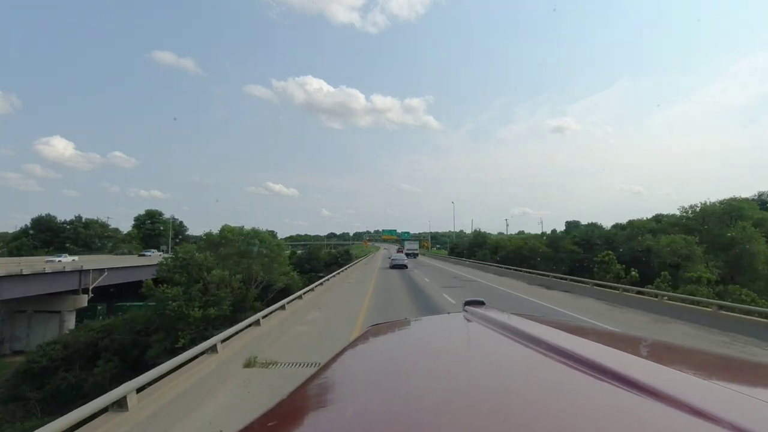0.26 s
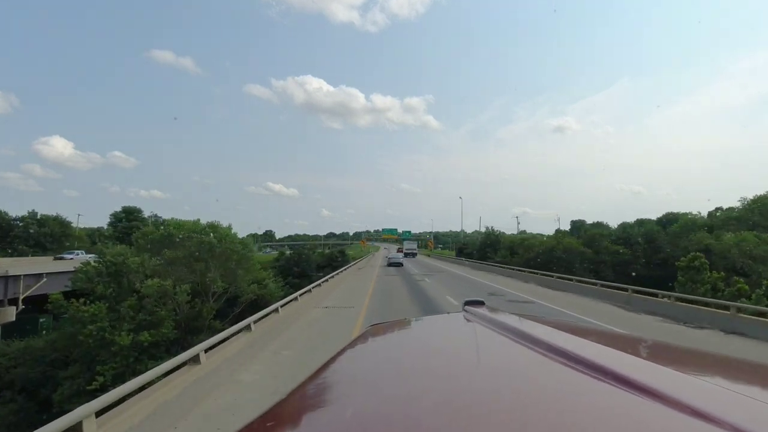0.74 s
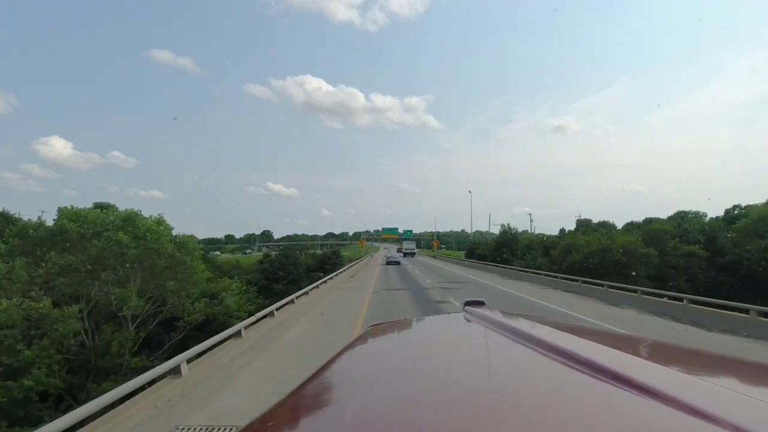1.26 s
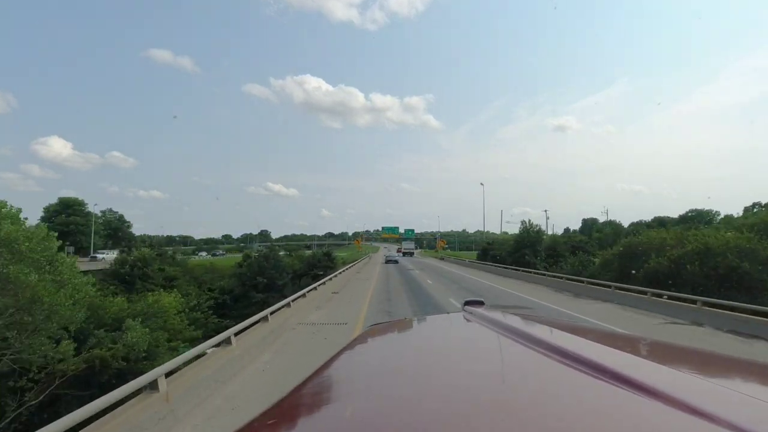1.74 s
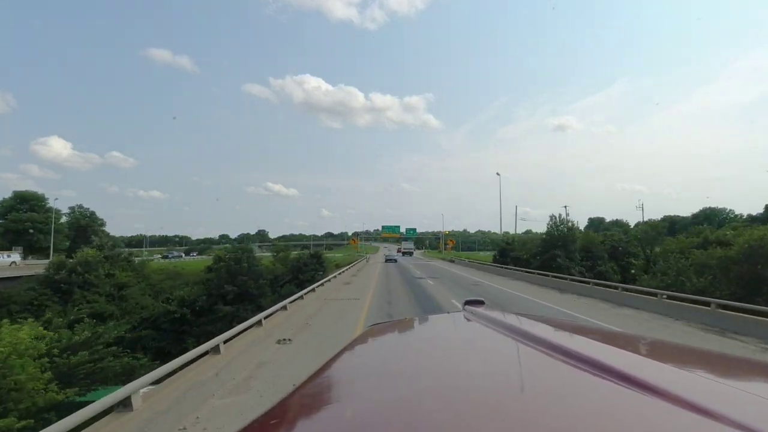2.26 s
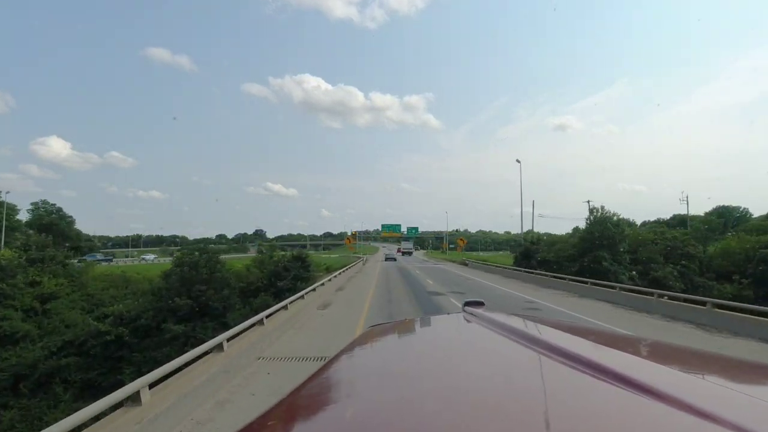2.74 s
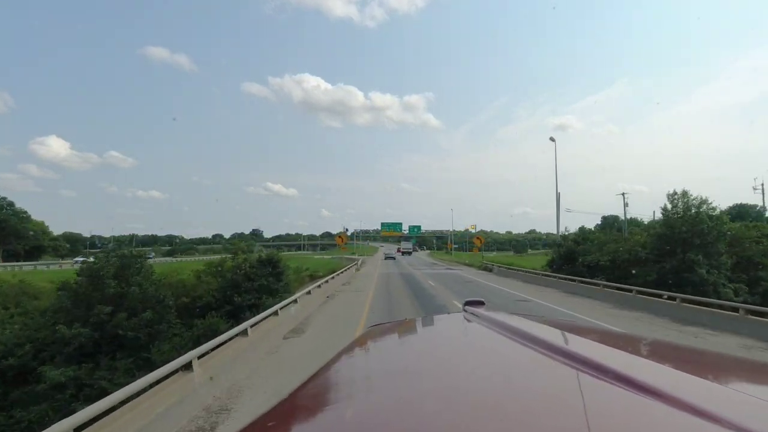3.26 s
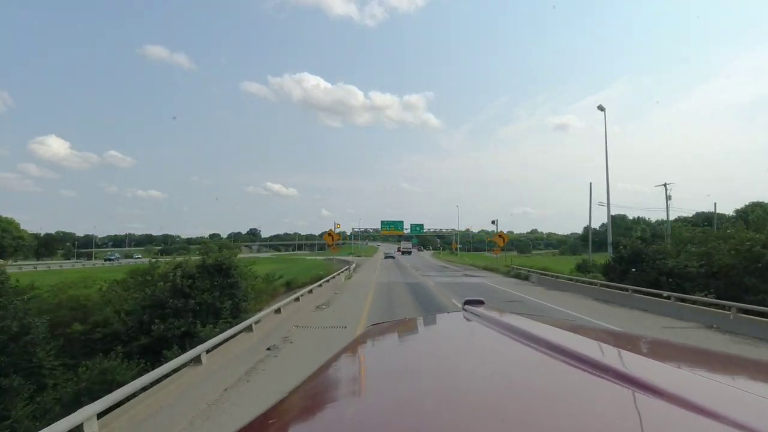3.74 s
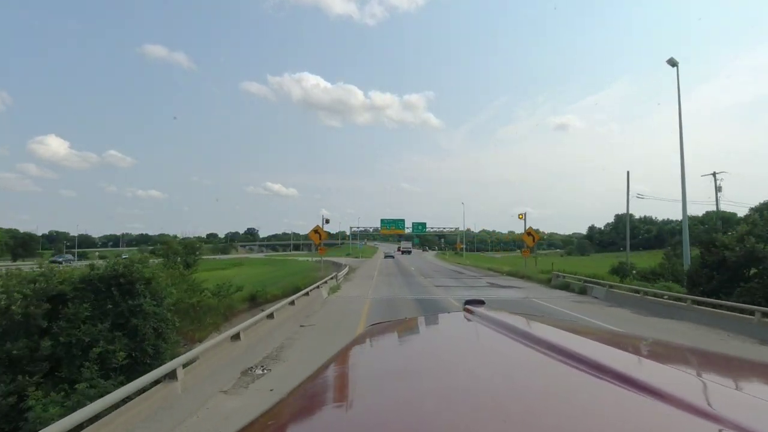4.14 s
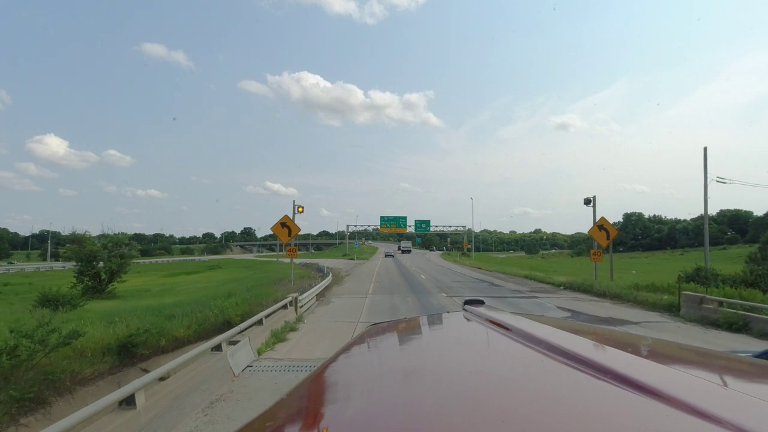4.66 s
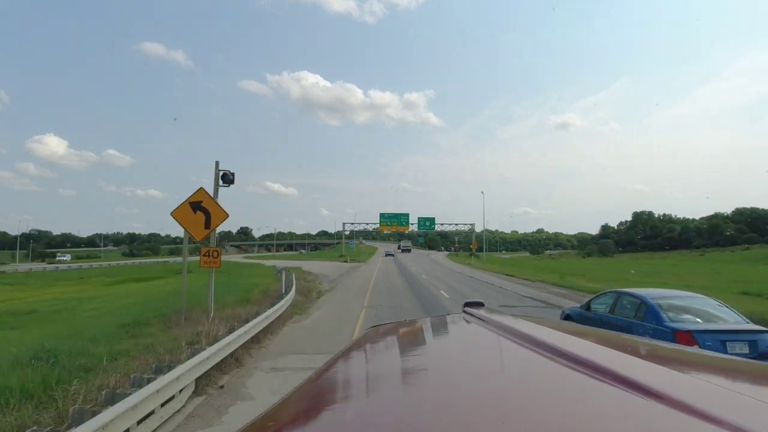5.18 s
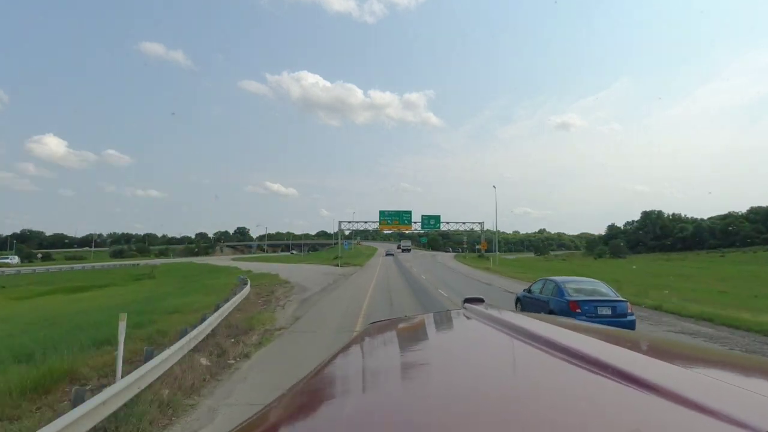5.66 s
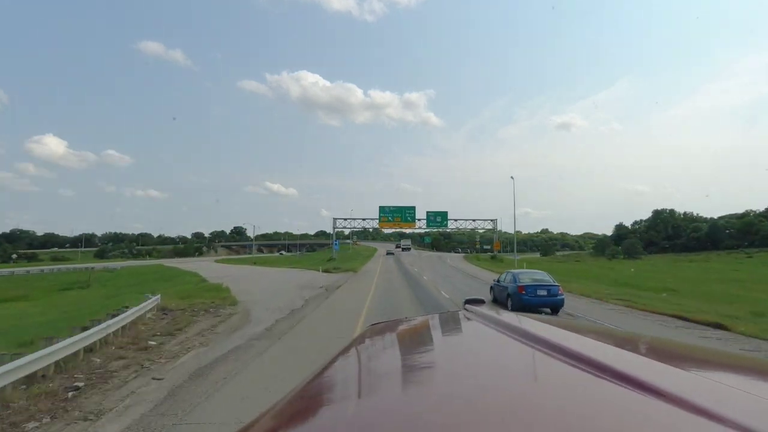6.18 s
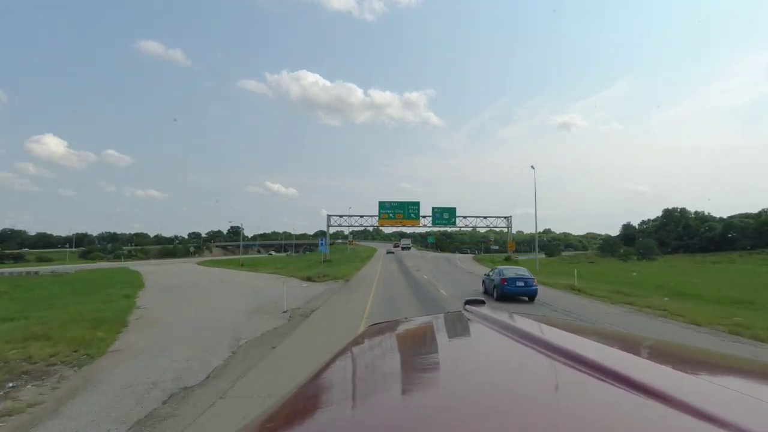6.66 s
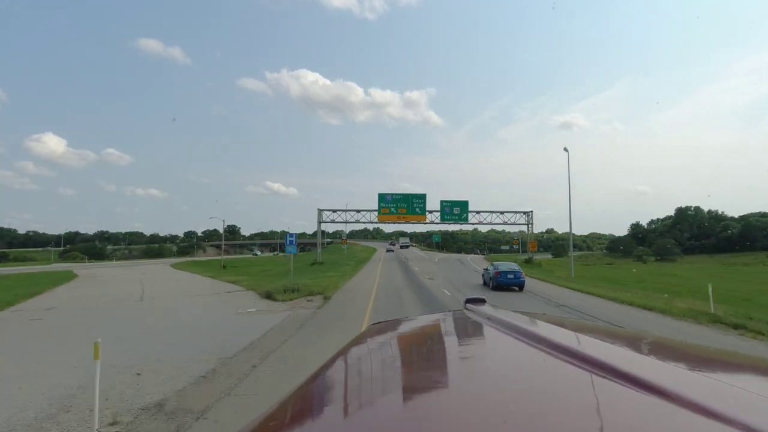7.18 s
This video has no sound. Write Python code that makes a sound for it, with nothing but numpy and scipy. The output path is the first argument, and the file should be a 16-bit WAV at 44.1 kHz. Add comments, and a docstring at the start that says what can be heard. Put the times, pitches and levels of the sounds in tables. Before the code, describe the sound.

Close stereo microphone in a moving truck cab. Pitched, rough engine braking opens the scene and stops after under a second, leaving tyre rumble, air rush and a softer engine hum that rises with throttle. A hard exhaust bark brings the brake back midway; its booming, crackling chatter slowly descends and weakens to the end, still braking, amid loose cab rattles, tiny high squeaks and a thin wavering turbo whistle.

```python
"""In the cab of a heavy diesel truck slowing on a highway ramp, the engine brake chatters: uneven blow-downs
drive engine orders through resonances, with cracks and gas noise. Shaped noise makes road rumble, air and an
early valve puff. The brake cuts out, the engine hums and revs for the downshift, cab trim squeaks and rattles
in short bursts, and a wavering sine whistles as the turbo. Then the brake barks back in and runs down slowly."""
import sys
import numpy as np
from scipy import signal
from scipy.fft import rfft, irfft, next_fast_len
from scipy.io import wavfile
from scipy.ndimage import uniform_filter1d, minimum_filter1d, map_coordinates

SR = 44100
rng = np.random.default_rng(int(sys.argv[2]) if len(sys.argv) > 2 else 0)


def pcm_store(signal):
    """Save signal as 16-bit PCM."""
    levels = np.round(np.clip(np.atleast_2d(signal), -1, 1) * 32767)
    wavfile.write(sys.argv[1], SR, levels.astype(np.int16).T)


N = 327209

# resonances of exhaust and cab, which boom as an engine order slides through: f/Hz, width/Hz, level/dB
BODY = [(44, 4.8, -17.5), (128.2, 8.7, -19), (154.83, 7.94, -9), (175.3, 42, -16.5), (220.24, 5.33, -5.5),
        (253.5, 5, -22.5), (309.5, 7.05, -16.5), (348.8, 8.3, -33), (380.3, 13.4, -20), (410, 18, -35.5),
        (523, 15, -35)]
# colour of the low exhaust churn: f/Hz, relative density/dB per Hz
CHURN = [(53, -39.5), (90, -11.5), (142, -3), (221, 6), (242, 4), (286, -20), (381, -3), (460, -27.5),
         (480, -24.5), (620, -56.5), (1060, -120)]
BRAKE_OFF_S, BRAKE_ON_S = 0.685, 3.431  # the brake rests during the downshift


def amp(db):
    """Decibels to gain."""
    return 10 ** (np.asarray(db) / 20)


def unit(x):
    """x at rms 1."""
    return x / np.sqrt(np.mean(x ** 2) + 1e-20)


def clock():
    """Time of every sample in seconds."""
    return np.arange(N) / SR


def along(points, hz):
    """Values at hz from (f/Hz, value) points, joined on a log frequency axis."""
    f, v = np.transpose(points)
    return np.interp(np.log(hz + 1), np.log(f + 1), v)


def curves(rows):
    """One value per sample for each column after the time."""
    s, *cols = np.transpose(rows)
    return [np.interp(clock(), s, c) for c in cols]


def wander(rate, t):
    """A smooth random value at the times t, rate knots a second."""
    knots = rng.standard_normal(int(N * rate / SR) + 4)
    return map_coordinates(knots, [t * rate])


def wobble(rate):
    """A smooth random curve with one value per sample, rate knots a second."""
    coarse = clock()[::64]
    return np.interp(clock(), coarse, wander(rate, coarse))


def switch(on, off, rise, fall):
    """Gain that climbs straight to 1 from the time on, and falls straight to 0 from the time off."""
    opening = np.clip((clock() - on) / rise, 0, 1)
    closing = np.clip((off - clock()) / fall + 1, 0, 1)
    return opening * closing


def swells(rows):
    """Gain of bell-shaped swells, each (t/s, level/dB, half length/s)."""
    return sum(amp(db) * np.exp(-np.minimum(((clock() - s) / half) ** 2, 50)) for s, db, half in rows)


def blip(start, rise):
    """An envelope that peaks at 1, rise seconds after start."""
    u = np.clip((clock() - start) / rise, 0, 50)
    return u * np.exp(1 - u)


def filtered(x, response):
    """x times a complex response of frequency."""
    m = next_fast_len(N + SR // 4)
    return irfft(rfft(x, m) * response(np.fft.rfftfreq(m, 1 / SR)), m)[..., :N]


def rush(spectrum, gate=1):
    """Stereo noise of rms 1, gated and then coloured; the bass is alike in both ears."""
    # likeness of the ears, from 1 for the same to 0 for unrelated: f/Hz, correlation
    likeness = [(100, 1), (250, 0.99), (500, 1), (1000, .68), (2000, -0.064), (12000, 0.15)]

    def colour(hz):
        turn = np.arccos(np.clip(along(likeness, hz), -1, 1)) / 2
        return amp(along(spectrum, hz)) * np.array([np.cos(turn), np.sin(turn)])

    mid, side = filtered(gate * rng.standard_normal((2, N)), colour)
    return unit(np.array([mid + side, mid - side]))


def whistle(hz, spread_hz):
    """A fuzzy tone of rms 1, its pitch wandering differently in each ear."""
    def ear():
        phase = 2 * np.pi * np.cumsum(hz + spread_hz * wobble(300)) / SR
        return np.sqrt(2) * np.sin(phase)

    return np.array([ear(), ear()])


def cycles(speed, first):
    """Engine cycles (two crank turns, six cylinders) counted from the time first."""
    count = np.cumsum(speed) / SR
    return count - np.interp(first, clock(), count)


def resonances(modes, f, age=np.inf):
    """Complex response at f, age seconds after the drive began: narrow resonances take longest to build up."""
    total = 0
    for k, (centre, width, db) in enumerate(modes):
        built_up = 1 - np.exp(-np.pi * width * age)
        peak = 1j * f * width / (centre * centre - f * f + 1j * f * width)
        total = total + (-1) ** k * amp(db) * built_up * peak  # neighbours have opposite signs
    return total


def orders(turns, gain, multiples, rough, size=16):
    """Sum of engine orders, each strength scattered at random so that no two cycles are quite alike."""
    pick = slice(None, None, size)  # worked out on every size-th sample
    t, wave = clock()[pick], 0
    for k in multiples:
        strength, colour = gain(k, pick)
        scatter = rough * (wander(14, t) + 1j * wander(14, t))
        wave = wave + np.real((strength + scatter) * colour * np.exp(2j * np.pi * k * turns[pick]))
    return np.sqrt(2) * signal.resample_poly(wave, size, 1)[:N]


def drone(turns, speed, age, strength, rough, count=44):
    """Every engine order sounds through the resonances of exhaust and cab."""
    def gain(k, pick):
        return strength(k, pick), resonances(BODY, k * speed[pick], age[pick])

    return orders(turns, gain, range(1, count + 1), rough)


def order_strength(blows, k):
    """Drive of order k by six blow-downs: even ones give only multiples of six, uneven ones fill in the rest."""
    push_db, lag_degrees, _ = np.transpose(blows)
    at = np.arange(6) / 6 + lag_degrees / 720  # place in the cycle
    return np.mean(amp(push_db) * np.exp(-2j * np.pi * k * at))


def per_cylinder(turns, blows):
    """Bark of whichever cylinder is blowing down."""
    cylinder = np.floor(turns * len(blows)).astype(int) % len(blows)
    return amp(np.transpose(blows)[2])[cylinder]


def rasp(wave, bark, crack_db, tear_db, sharpness, muffle_hz):
    """Each pressure crest steepens into a crack that rings the stacks and tears off a burst of gas noise."""
    # ring of the exhaust stacks: f/Hz, width/Hz, level/dB
    stack = [(511, 22, 2.5), (688.4, 34, -3.5), (793.4, 28, -2.5), (972, 16, -1), (1180, 33, -15.5),
             (1470, 84, -20.5), (2100, 190, -19)]
    # colour of the torn gas: f/Hz, relative density/dB per Hz
    gas = [(250, -33), (400, -3), (445, -10.5), (471, -20), (520, -7), (593, -12), (682, -5.5),
           (888, -14.5), (972, -8), (1110, -20.5), (1240, -24), (1530, -26.5), (1730, -38), (3000, -44.5),
           (3900, -77), (6600, -120)]

    def stack_response(f):
        low_cut = f ** 4 / (f ** 4 + 420 ** 4)
        return resonances(stack, f) / (1 + (f / 1700) ** 4) * low_cut

    # even out the level over 25 ms
    wave = wave / np.sqrt(np.abs(uniform_filter1d(wave ** 2, SR // 40)) + 1e-9)
    crests = signal.find_peaks(wave, height=0, distance=SR // 330)[0]
    cracks = np.zeros(N)
    cracks[crests] = (np.tanh(wave) * bark * amp(3.1 * wobble(90)))[crests]
    ring = unit(filtered(cracks, stack_response))
    jets = bark * (0.42 + np.clip(wave, 0, 1.5) ** sharpness)
    harsh = amp(crack_db) * ring + amp(tear_db) * rush(gas, jets)
    return filtered(harsh, lambda f: 1 / (1 + (f / muffle_hz) ** 4))


def high_gear_brake():
    """The brake at low engine speed: six uneven blow-downs a cycle, softened in the high orders, chatter."""
    # engine speed: t/s, cycles per s
    high_gear_speed = [(0, 11.48), (.7, 11.39)]
    # the six unequal blow-downs of a cycle: push level/dB, lag/crank degrees, bark level/dB
    high_gear_blows = [(-5, -4, -3.5), (-12.5, 2.5, -3.5), (3.5, -3.5, 2), (-13, -1.3, -6), (-2, 15, -3),
                       (-2, -6.5, -5)]
    soft_order = 33.6  # the blow-downs carry little above this order

    def strength(k, pick):
        return order_strength(high_gear_blows, k) / (1 + (k / soft_order) ** 10)

    speed, = curves(high_gear_speed)
    turns = cycles(speed, first=0.007475)
    # the brake has been on for a second as we start to listen
    wave = drone(turns, speed, clock() + 1, strength, rough=0.039)
    bark = per_cylinder(turns, high_gear_blows)
    churn = amp(-27) * rush(CHURN, bark)
    chatter = amp(-37.5) * rasp(wave, bark, crack_db=-0.7, tear_db=-1.5, sharpness=.7, muffle_hz=2200)
    return (wave + churn + chatter) * switch(on=0, off=BRAKE_OFF_S, rise=.004, fall=0.066)


def road():
    """Tyres shake the cab; wind and engine-bay air leak in as a steady rush and a hiss."""
    # colour of the rumble: f/Hz, relative density/dB per Hz
    rumble_colour = [(8.8, -29), (15, 5), (92, -2.5), (110, -10), (140, -34.5), (240, -120)]
    # jolts that shake the cab: t/s, level/dB, half length/s
    jolts = [(1.13, -33, .08), (2.56, -31, .05), (2.83, -30.5, .07), (3.45, -21.5, 0.056),
             (4.69, -31, 0.19), (5.7, -22.5, .2), (6.4, -25, .09)]
    # colour of the rush inside the cab: f/Hz, relative density/dB per Hz
    cab_colour = [(41, -31.5), (70, -0.5), (92, -17.5), (129, -3), (158, -17), (212, -8.5), (248, -20.5),
                  (284, -13), (325, -17.5), (417, -22), (446, -24.5), (701, -26), (899, -28.5),
                  (1510, -33.5), (15500, -64.5)]
    # course of the hiss, before its lift and flicker: t/s, level/dB
    air_course = [(.55, -57), (.77, -63), (1.7, -71), (2.65, -65.5), (3.2, -66), (4.5, -62.5), (5.65, -57),
                  (7.4, -60.5)]
    # colour of the hiss: f/Hz, relative density/dB per Hz
    hiss_colour = [(1500, -14.5), (3000, -5.5), (5000, -0.5), (6900, -13), (8200, -2), (9200, 5.5),
                   (10500, -4.5), (12500, -8.5), (15500, -9)]
    rumble_db = -30.5 + 1.5 * wobble(3.8)
    rumble = (amp(rumble_db) + swells(jolts)) * rush(rumble_colour)
    gusts_db = .6 * wobble(8)
    cab = amp(-32 + gusts_db) * rush(cab_colour)
    course_db, = curves(air_course)
    hiss = amp(course_db + 4.5 + 0.85 * wobble(23)) * rush(hiss_colour)
    return rumble + cab + hiss


def air_valve():
    """A short puff of compressed air: coloured noise with a quick rise and a slower fall."""
    # colour of the puff: f/Hz, relative density/dB per Hz
    puff_colour = [(1180, -37.5), (2000, -6), (2660, -13.5), (2870, -4.5), (3080, -6), (4450, -2.5),
                   (7090, -13.5), (9180, -4.5), (15600, -13.5)]
    return amp(-33.5) * rush(puff_colour) * switch(on=0.11, off=0.17, rise=0.028, fall=0.078) ** 2


def throttle():
    """Off the brake the engine hums through the same resonances, and is revved to match the lower gear."""
    # engine speed during the downshift: t/s, cycles per s
    throttle_speed = [(.78, 11.2), (1.18, 10.75), (1.45, 11.62), (1.7, 12.68), (2, 13.3), (2.2, 13.54),
                      (2.35, 13.3), (2.66, 13.28), (2.9, 12.92)]
    # dabs of throttle, ahead of the resonances: t/s, level/dB, half length/s
    dabs = [(1.18, -15.5, 0.042), (2.67, -3, 0.21)]
    # balance of the overtones: multiple of the cycle rate, relative level/dB
    throttle_tone = [(6, -3.5), (10, -18), (14, -9.5), (15, -14.5), (16, 2), (17, -10.5), (18, -5.5),
                     (20, -12), (22, -13.5), (23, -10.5)]
    coast_db, pedal_db, lift_s = -31, -15, 2.86  # no throttle, light throttle added, foot lifts
    speed, = curves(throttle_speed)
    turns = cycles(speed, first=0)
    light = amp(pedal_db) * switch(on=0.61, off=lift_s, rise=1.0, fall=0.097)
    revs = swells(dabs) * switch(on=0, off=lift_s, rise=.1, fall=0.12)
    pedal = amp(coast_db) + light + revs

    hum_orders = {12: 1, 24: amp(-11.5)}
    hum_gain = lambda k, pick: (hum_orders[k], resonances(BODY, k * speed[pick]))
    hum = pedal * orders(turns, hum_gain, hum_orders, rough=0.033)

    tone = {round(k): amp(db) * np.exp(2j * np.pi * rng.random()) for k, db in throttle_tone}
    overtones = unit(orders(turns, lambda k, pick: (1, tone[k]), tone, rough=0.1))
    overtone_db = -36 + 3 * (speed - 12)  # louder by 3 dB for each cycle per s
    return (hum + amp(overtone_db) * overtones) * switch(on=0.55, off=3.42, rise=0.041, fall=0.029)


def fittings():
    """Trim squeaks as short fuzzy tones and loose parts rattle as noise bursts while the cab flexes."""
    # squeaks of the cab trim, before a common trim of level: t/s, level/dB, f/Hz
    trim_squeaks = [(1.3024, -51, 12800), (1.3783, -62, 12700), (1.8063, -63, 12800),
                    (2.6005, -52.5, 12700), (3.8695, -56.5, 12900), (5.3033, -54, 12600),
                    (5.7423, -52, 12800), (5.7788, -54, 12700), (6.1459, -38.5, 12600)]
    # rattles of loose fittings, before a common trim of level: t/s, level/dB
    loose_parts = [(2.3787, -46.5), (2.4587, -46), (2.6289, -42), (2.7289, -46), (2.9094, -46),
                   (3.4638, -44.5), (4.679, -47), (5.594, -34.5), (5.7142, -34.5), (5.77, -40)]
    # colour of the rattles: f/Hz, relative density/dB per Hz
    rattle_colour = [(1200, -4), (2200, 1.5), (3300, 3), (5100, -2), (7000, -9), (9300, -2.5),
                     (15000, -7.5)]
    squeaks = sum(amp(db - 7.0) * blip(s, rise=.012) * whistle(hz, spread_hz=140)
                  for s, db, hz in trim_squeaks)
    shakes = sum(amp(db - 10.5) * blip(s, rise=0.02) for s, db in loose_parts)
    return squeaks + shakes * rush(rattle_colour)


def turbo():
    """The turbocharger's whistle flutters during the shift, then climbs to a steady pitch, coming and going."""
    # whistle during the shift: t/s, f/Hz, level/dB
    shift_whistle = [(2.85, 5900, -74), (3.25, 5700, -63.5), (3.5, 5740, -60), (3.7, 6400, -65.5),
                     (4, 6520, -86)]
    # swells of the climbing whistle, before a random flicker: t/s, level/dB, half length/s
    whistle_swells = [(4.37, -63, .08), (5.32, -60.5, .06), (6.28, -56, 0.16), (6.88, -59, 0.41)]
    settled_hz, spool_hz, spool_at_s, spool_s = 5420, 798.4, 4.37, .87  # pitch, depth below, when, time constant
    hz, db = curves(shift_whistle)
    shift = amp(db) * whistle(hz, spread_hz=130) * switch(on=2.8, off=4.5, rise=.1, fall=.1)
    below_hz = spool_hz * np.exp(-np.maximum(clock() - spool_at_s, -.5) / spool_s)
    climb = whistle(settled_hz - below_hz, spread_hz=7 + .06 * below_hz)
    return shift + swells(whistle_swells) * amp(1.2 * wobble(20)) * climb


def low_gear_brake():
    """After the downshift, a hard bark, then a drone whose boom moves up the orders as the engine slows."""
    # engine speed: t/s, cycles per s
    low_gear_speed = [(3.45, 13.196), (4, 12.987), (4.8, 12.825), (5.6, 12.654), (6.2, 12.502),
                      (7.42, 12.21)]
    # six blow-downs at full speed: push level/dB, lag/crank degrees, bark level/dB
    fast_blows = [(8.5, 17, 4.5), (0, 21.5, 0.5), (5.5, 8, -1.5), (6, 23.5, -9.5), (-1.6, -30.5, -5),
                  (-0.2, 25, -2.5)]
    # and once the engine has slowed: push level/dB, lag/crank degrees, bark level/dB
    slowed_blows = [(5.5, 17, 1.5), (1.6, 23, -1.5), (1, 4.5, -5), (3.5, 21, -9), (3, -22.0, 1.5),
                    (-2.5, 28.5, 0.0)]
    # colour of the first bark: f/Hz, relative density/dB per Hz
    first_bark_colour = [(30, 6), (60, 10.5), (120, 1.5), (180, 8), (212, 23), (260, 9.5), (320, 4),
                         (500, -4), (1000, -1), (1500, -16), (2100, -15), (2700, -33.5), (3280, -24),
                         (3700, -38), (12000, -62)]
    slowing_from_s, slowing_s = 4.18, 2.4  # the one pattern gives way to the other
    boost_db, boost_s = 3, .4  # extra rasp as the brake bites, and its time constant
    ease_db_per_s = 1.31  # the braking eases as the truck slows

    speed, = curves(low_gear_speed)
    turns = cycles(speed, first=3.455)
    age = np.maximum(clock() - BRAKE_ON_S, 0)
    slowed = np.clip((clock() - slowing_from_s) / slowing_s, 0, 1)

    def strength(k, pick):
        fast = (1 - slowed[pick]) * order_strength(fast_blows, k)
        return fast + slowed[pick] * order_strength(slowed_blows, k)

    wave = drone(turns, speed, age, strength, rough=0.058)
    bark = (1 - slowed) * per_cylinder(turns, fast_blows) + slowed * per_cylinder(turns, slowed_blows)
    churn = amp(-29) * rush(CHURN, bark)
    chatter_db = -32 + boost_db * np.exp(-age / boost_s)
    chatter = amp(chatter_db) * rasp(wave, bark, crack_db=-4.5, tear_db=-0.5, sharpness=.6, muffle_hz=3500)
    # the first blow-downs, under full boost, are the harshest
    first_bark = amp(-14.0 - ((clock() - 3.482) / 0.0081) ** 2) * rush(first_bark_colour)
    # still braking at the end
    effort = amp(-ease_db_per_s * age) * switch(on=BRAKE_ON_S, off=8, rise=0.012, fall=.01)
    return (amp(2.02) * wave + churn + chatter + first_bark) * effort


def scene():
    """Engine, road and cab together."""
    engine = high_gear_brake() + throttle() + turbo() + low_gear_brake()
    return engine + road() + air_valve() + fittings()


def limiter(x, ceiling, hold):
    """Turns the gain down for a moment wherever a peak would pass the ceiling."""
    size = max(int(hold * SR), 8)
    needed = np.minimum(1, ceiling / (np.abs(x).max(axis=0) + 1e-9))
    return x * uniform_filter1d(minimum_filter1d(needed, size), size)


def record(dry):
    """The left microphone port leads slightly; peaks are limited and nothing is kept above 15.6 kHz."""
    # lead of the left port over the right: f/Hz, phase/rad
    port_lead = [(20, 0), (100, 0.17), (160, 0.14), (220, 0.12), (310, 0.09), (390, 0.82), (530, 0.34),
                 (1000, 0.16), (3000, 0)]
    ports = lambda hz: np.exp(.5j * along(port_lead, hz) * np.array([[1], [-1]]))
    held = limiter(filtered(dry, ports), ceiling=0.87, hold=0.01)
    return filtered(held, lambda hz: hz < 15600)


dry = scene()
out = record(dry)
pcm_store(out)
```